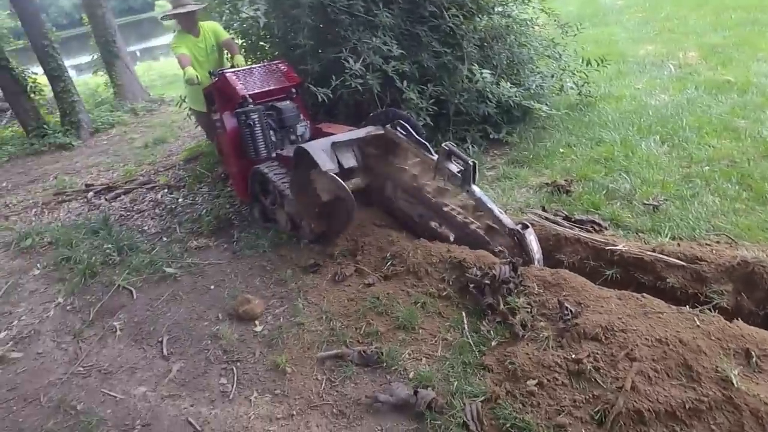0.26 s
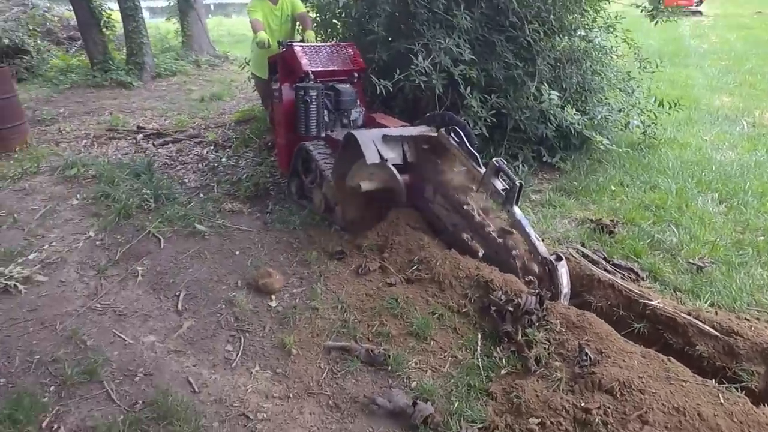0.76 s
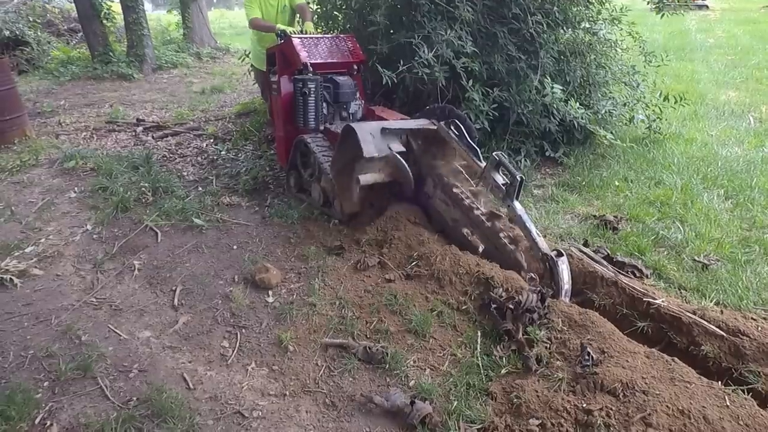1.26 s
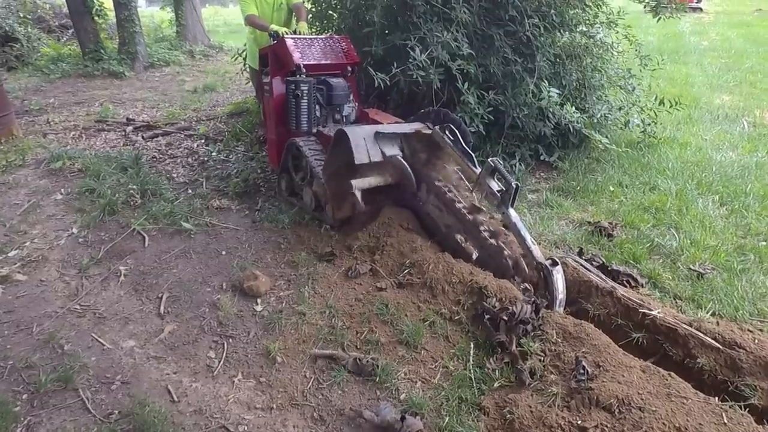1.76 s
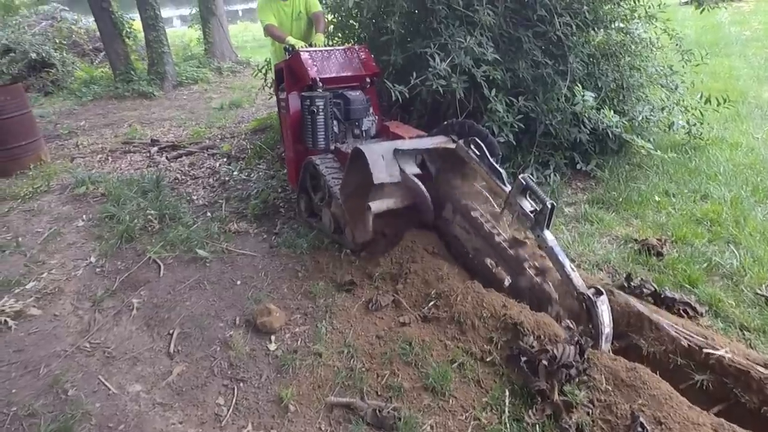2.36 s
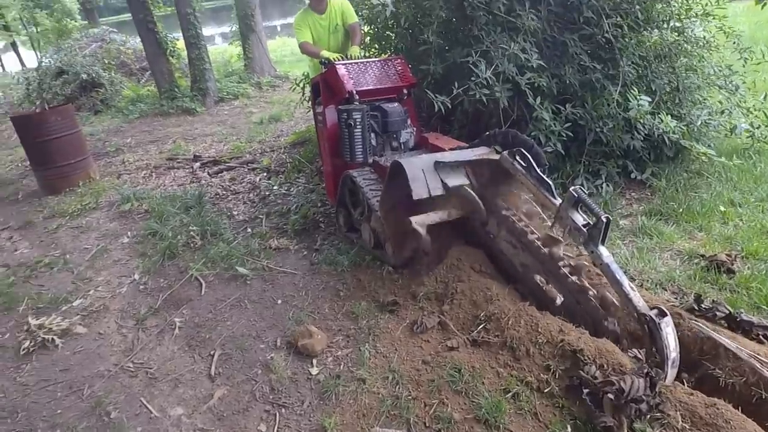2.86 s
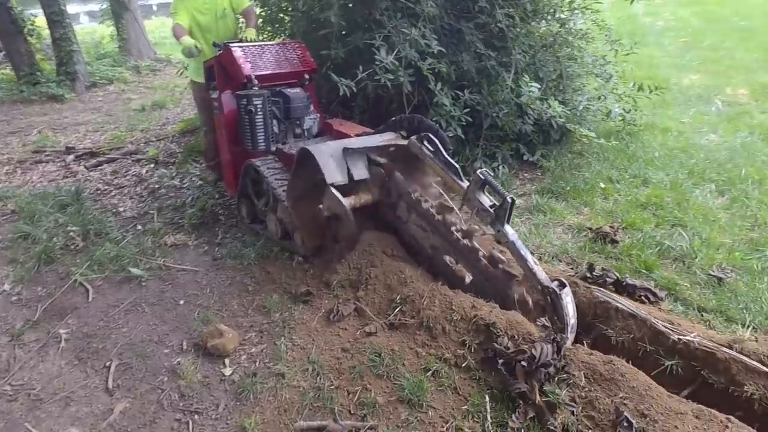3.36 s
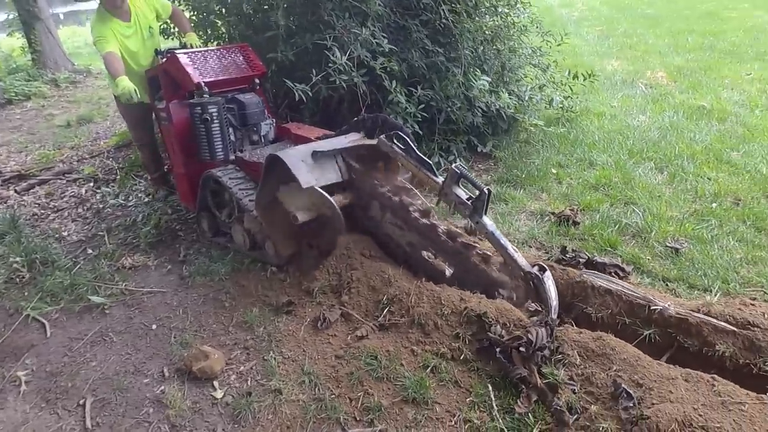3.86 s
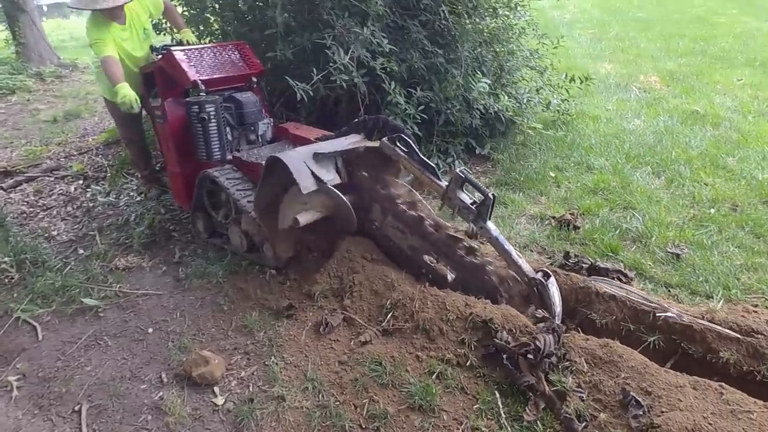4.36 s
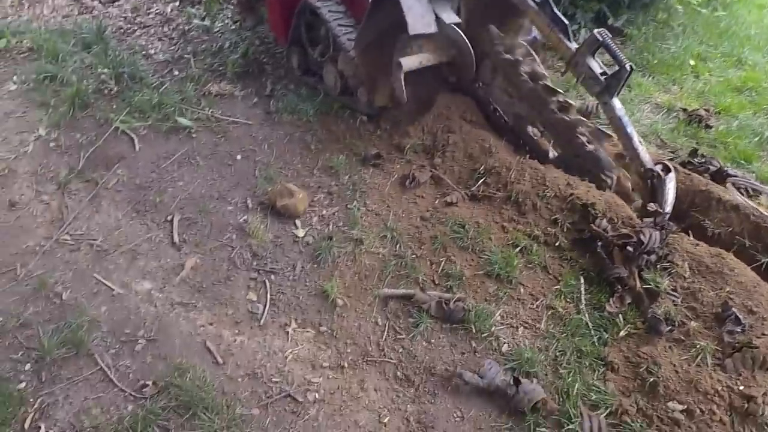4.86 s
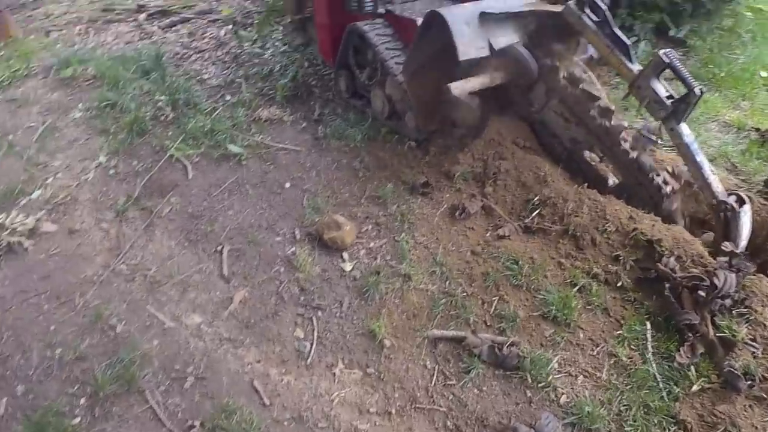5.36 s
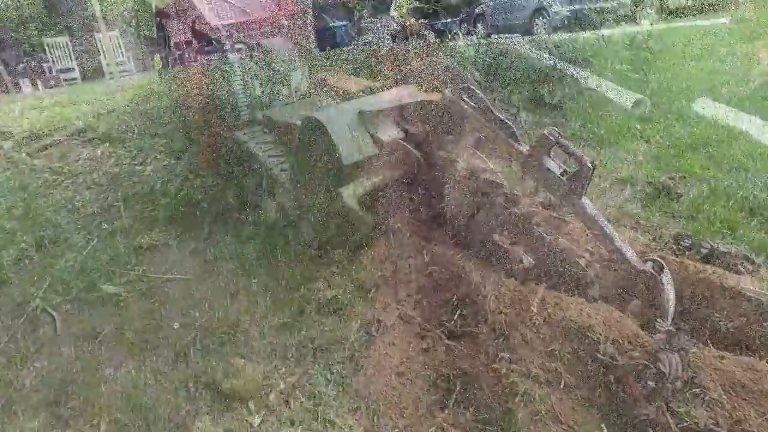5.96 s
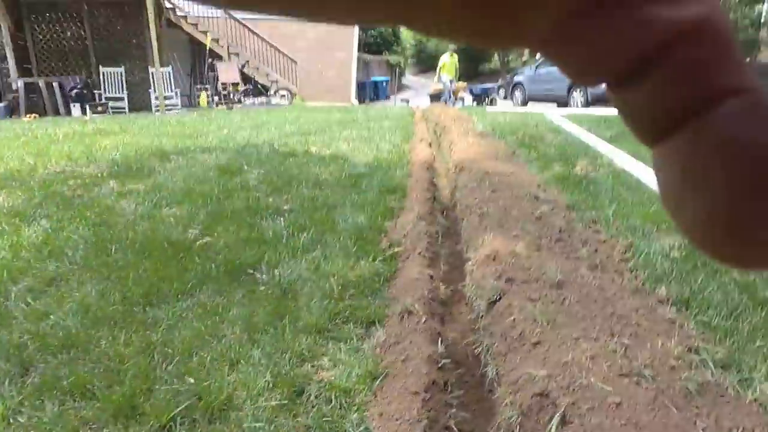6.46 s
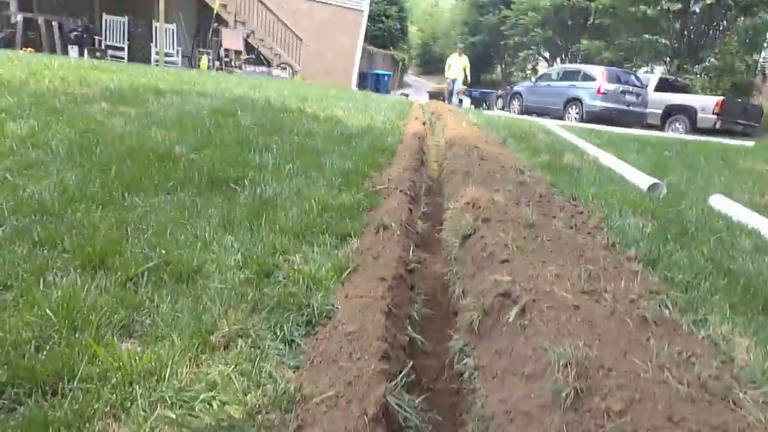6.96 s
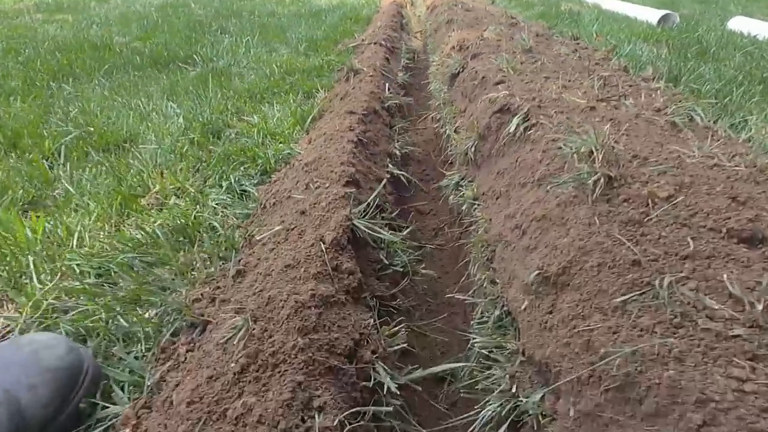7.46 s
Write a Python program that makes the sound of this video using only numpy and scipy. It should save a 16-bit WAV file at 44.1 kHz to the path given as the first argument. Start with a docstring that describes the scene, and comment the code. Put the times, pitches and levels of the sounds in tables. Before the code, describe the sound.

Outdoors, a nearby trenching machine keeps up a steady, throbbing engine drone with whining and metallic clatter. Its chain ticks and strikes stones while loose earth slides away with a gritty hiss. After about five and a half seconds it fades into a quiet lawn with a far-off motor humming. Fingers bump, tap and brush the microphone, and grass and clothing rustle faintly close by.

```python
"""At a trench, then on a quiet lawn. A tracked trencher digs at steady throttle: a V-twin fires unevenly
into its muffler, pump and fan whine, valve gear and covers clatter, earth slides off the chain and its
teeth knock on stones. The machine fades into soft air and a far, throbbing motor hum. A hand bumps,
taps and brushes the microphone housing; grass and cloth rustle close by."""
import sys
import numpy as np
from scipy import signal
from scipy.io import wavfile
from scipy.ndimage import uniform_filter1d

SR = 44100
rng = np.random.default_rng(int(sys.argv[2]) if len(sys.argv) > 2 else 0)


def generate_wav(sig):
    """Save sig (samples, or channels by samples) to the path in sys.argv[1] as 16-bit PCM at SR."""
    pcm = np.round(np.clip(np.atleast_2d(sig).T, -1, 1) * 32767).astype(np.int16)
    wavfile.write(sys.argv[1], SR, pcm)


N = 340452
TIME = np.arange(N) / SR

# Crank speed as the governor hunts: time_s, speed_rpm
CRANK_SPEED = [(0.0, 3410), (0.2, 3376), (0.41, 3481), (0.55, 3356), (1.05, 3436), (1.22, 3394),
               (1.5, 3427), (1.9, 3395), (2.07, 3445), (2.26, 3398), (2.62, 3425), (2.8, 3383),
               (3.28, 3426), (3.58, 3399), (4.36, 3424), (4.8, 3389), (5.0, 3416), (5.38, 3402),
               (5.73, 3465), (5.9, 3402), (6.4, 3428)]
# Fine hiss of grit, cooling air or a sliding finger: freq_hz, relative_db
HISS_SPECTRUM = [(4000, -27), (8000, -2), (10000, -4), (13000, 3), (15500, -6.5)]


def gain_of(db):
    return 10 ** (np.asarray(db) / 20)


def unit_rms(x):
    return x / np.sqrt(np.mean(x ** 2) + 1e-20)


def spectrum_db(points, hz):
    """Interpolate on a log-frequency axis."""
    freq_hz, level_db = np.transpose(points)
    return np.interp(np.log(hz + 1), np.log(freq_hz + 1), level_db)


def curve(points):
    """Time-value pairs, interpolated per sample."""
    return np.interp(TIME, *np.transpose(points))


def bell_curve(centre_s, width_s):
    return np.exp(-((TIME - centre_s) / width_s) ** 2)


def wander(rate_hz):
    """Slow random curve, rms 1."""
    smoothed = uniform_filter1d(rng.standard_normal(N), 400)
    return unit_rms(signal.lfilter([1], [1, -np.exp(-2 * np.pi * rate_hz / SR)], smoothed))


def tone(hz):
    """Sine following a pitch curve, rms 1."""
    return np.sqrt(2) * np.sin(2 * np.pi * np.cumsum(hz) / SR)


def add(mix, start_s, sound):
    part = mix[max(round(start_s * SR), 0):][:len(sound)]
    part += sound[:len(part)]


def resonate(x, hz, width_hz):
    """Unity-gain resonance: shift to 0 Hz, smooth, shift back."""
    carrier = np.exp(2j * np.pi * np.cumsum(hz * np.ones(len(x))) / SR)
    pole = np.exp(-np.pi * width_hz / SR)
    return 2 * (carrier * signal.lfilter([1 - pole], [1, -pole], x / carrier)).real


def impulse_response(points):
    """Minimum-phase response of a spectrum."""
    log_gain = spectrum_db(points, abs(np.fft.fftfreq(2 ** 15, 1 / SR))) * np.log(10) / 20
    return np.fft.ifft(np.exp(log_gain - 1j * signal.hilbert(log_gain).imag)).real[:2 ** 13]


def noise(points, patchy_db, flicker_db):
    """Shaped noise with drifting spectral patches and broadband flicker, rms 1."""
    frames, hz = N // 256 + 5, np.fft.rfftfreq(1024, 1 / SR)
    real, imag, patches = rng.standard_normal((frames, 513, 3)).T
    patches = unit_rms(uniform_filter1d(uniform_filter1d(patches, 12, 0), 10, 1))
    flicker = unit_rms(uniform_filter1d(rng.standard_normal(frames), 3))
    field_db = spectrum_db(points, hz)[:, None] + patchy_db * patches + flicker_db * flicker
    spectra = (real + 1j * imag) * gain_of(field_db)
    return unit_rms(signal.istft(spectra, nperseg=1024, noverlap=768)[1][:N])


def knock(level_db, hz, thwack_db, treble_db, ring_s, crack_s):
    """Impact: a ring, a broad thwack above it, a bright crack. Decay times are to -60 dB."""
    t = np.arange(3000) / SR
    front = gain_of(-60 * t / crack_s) * np.minimum(t / 0.00047, 1)
    ring = np.sin(2 * np.pi * hz * t) * gain_of(-60 * t / ring_s)
    thwack = unit_rms(resonate(rng.standard_normal(len(t)), 1.76 * hz, hz)) * gain_of(thwack_db) * front
    crack = rng.standard_normal(len(t)) * gain_of(treble_db) * front
    return gain_of(level_db) * (1.12 * ring + 0.63 * thwack + 1.7 * crack)


def firings(uneven_db, second_db):
    """One click per firing of a four-stroke twin, cylinders 270 of 720 degrees apart."""
    cycles = np.cumsum(curve(CRANK_SPEED) / 120) / SR - 0.492  # two turns per cycle
    clicks = np.zeros(N)
    for lag_cycles, level_db in ((0, 0), (3 / 8, second_db)):
        at = np.flatnonzero(np.diff(np.floor(cycles - lag_cycles)))
        clicks[at] = gain_of(level_db + uneven_db * rng.standard_normal(400)[:len(at)])
    return clicks


def exhaust(clicks, level_db=-19):
    """Each firing rings the muffler; unburnt fuel from a weak firing feeds the next cycles."""
    # Response of muffler and ground: freq_hz, relative_db
    muffler = [(8, -45), (28, -24), (57, -7), (85, -14), (114, -14), (142, 0), (171, -2), (199, 0),
               (228, -14), (256, -23), (312, -41), (341, -24), (370, -22), (398, -31), (426, -26),
               (455, -32), (490, -26), (540, -26), (568, -22), (600, -31), (700, -30), (1000, -50)]
    # Weak firings: time_s, loss_db
    stumbles = [(.9, 2), (1.155, 3.5), (2.03, 3), (2.24, 3.5), (3.65, 4), (3.9, 5), (4.531, 0.5),
                (4.86, 2.5), (5.649, 2)]
    for time_s, loss_db in stumbles:
        rebound = 0.13 * bell_curve(time_s + 0.08, 0.11)
        level_db = level_db - loss_db * (bell_curve(time_s, 0.025) - rebound)
    ring = -impulse_response(muffler)
    steady_rms = np.sqrt(np.mean(signal.oaconvolve(clicks, ring) ** 2))
    drive = clicks * gain_of(level_db)
    lead_in = round(SR * 120 / CRANK_SPEED[0][1])  # one cycle: already running at the start
    return signal.oaconvolve(np.r_[drive[:lead_in], drive], ring)[lead_in:N + lead_in] / steady_rms


def pump_and_fan(gear_hz=644.6, rise_hz_per_s=0.5, blades=27):
    """Trembling gear tone of the hydraulic pump; thin fan whine at the blade rate."""
    # Pump tone: time_s, level_db
    pump_level = [(0, -40), (.8, -39.5), (1.5, -37), (3.2, -36.5), (4.1, -37), (5.5, -39)]
    # Fan whine: time_s, level_db
    fan_level = [(.9, -57), (1.3, -48), (4.5, -49), (4.9, -57), (5.6, -50.5), (6.2, -46)]
    pump = tone(gear_hz + rise_hz_per_s * TIME + 0.5 * wander(rate_hz=13))
    fan = tone(blades * curve(CRANK_SPEED) / 60 + 4.66 * wander(rate_hz=14))
    fan *= gain_of(curve(fan_level) + 2.3 * wander(rate_hz=6.5))
    pump *= gain_of(curve(pump_level) + 1.2 * wander(rate_hz=7.7))
    return pump + fan


def firing_puffs(clicks):
    """Envelope: a swell of random size just after each firing."""
    t = np.arange(1200) / SR
    swell = (t / 0.0028) ** 2 * np.exp(2 - 2 * t / 0.003)
    return signal.oaconvolve(clicks * gain_of(1.34 * rng.standard_normal(N)), swell)[:N]


def clatter(puffs):
    """Valve gear, casing, fan and chain: noise pulsing with the firings."""
    # Mechanical noise: freq_hz, relative_db
    spectrum = [(20, -12), (50, -22), (120, -11.5), (220, -10.5), (310, -21.5), (400, -20), (480, -15),
                (650, -12), (860, -24), (1500, -22.5), (2500, -36), (3500, -32), (5000, -39.5),
                (15000, -79)]
    return gain_of(1) * noise(spectrum, patchy_db=-1, flicker_db=1.72) * (0.67 + 0.22 * puffs)


def covers(bite_db):
    """Covers ring, louder as the chain bites."""
    # Cover resonances: pitch_hz, width_hz, relative_db
    modes = [(965.5, 62, -14.5), (2117, 30, -28), (5050, 96, -24.5), (6330, 150, -29)]
    out = np.zeros(N)
    for hz, width_hz, relative_db in modes:
        gain = gain_of(relative_db + 1.3 * bite_db + 2.6 * wander(rate_hz=2.1))
        out += gain * unit_rms(resonate(rng.standard_normal(N), hz, width_hz))
    return out


def rattle(hits_per_s=110, parts=16):
    """Small parts knock at random, each at its own pitch; rms 1."""
    size_db = 4.8 * np.minimum(rng.exponential(1, N), 3)
    hits = gain_of(size_db) * (rng.random(N) < hits_per_s / SR)
    struck_part = rng.integers(0, parts, N)
    out = np.zeros(N)
    for part, hz in enumerate(np.geomspace(450, 2200, parts)):
        ring = knock(0, hz, thwack_db=-10, treble_db=-17, ring_s=0.024, crack_s=0.055)
        out += signal.oaconvolve(hits * (struck_part == part), ring)[:N]
    return unit_rms(out)


def earth(puffs, bite_db):
    """Soil and grit slide off the teeth; a bright spray swells as the microphone tips toward them."""
    # Sliding soil: freq_hz, relative_db
    soil_spectrum = [(1000, -16), (3000, -4.5), (5000, -3.5), (7000, -2.5), (10000, -6.5), (15000, -27)]
    # Grit spray: freq_hz, relative_db
    spray_spectrum = [(6000, -28), (7500, -9), (9500, -20), (12300, -12), (13500, 0), (15500, 0)]
    soil = gain_of(-44.5 + bite_db) * noise(soil_spectrum, patchy_db=2.5, flicker_db=2.3)
    grit = gain_of(-46 + 0.5 * bite_db) * noise(HISS_SPECTRUM, patchy_db=1.5, flicker_db=0.4)
    spray = gain_of(-42) * bell_curve(5.05, 0.4) * noise(spray_spectrum, patchy_db=1.5, flicker_db=-1)
    return soil * (0.81 + 0.5 * puffs) + grit * (1.1 + 0.18 * puffs) + spray


def casing_pops(trim_db=-5.5, pitch_hz=688):
    """Dull pops where a firing shakes the casing harder."""
    # Casing pops: start_s, relative_db
    pops = [(0.022, -15), (0.267, -23), (0.335, -31), (0.652, -26), (0.724, -16), (0.97, -14.5),
            (1.638, -31), (1.99, -16), (2.108, -25), (2.34, -20), (2.989, -14.5), (3.294, -14),
            (3.515, -11.5), (3.713, -27), (4.219, -23), (4.64, -35), (5.17, -19), (5.382, -19)]
    out = np.zeros(N)
    for start_s, relative_db in pops:
        pop = knock(relative_db, pitch_hz, thwack_db=-11.5, treble_db=-25, ring_s=0.021, crack_s=0.042)
        add(out, start_s, pop)
    return gain_of(trim_db) * out


def link_ticks(fade, sharp_trim_db=-5.5, faint_db=-37, faint_per_s=5):
    """Chain links tick: sharp ones at set times, faint random ones that follow the fade."""
    # Sharp link ticks: start_s, relative_db, pitch_hz
    sharp_ticks = [(0.042, -26.5, 5200), (0.8789, -25, 5430), (1.0225, -29.5, 9200), (1.124, -26.5, 4800),
                   (1.1608, -31, 4760), (1.406, -31, 5250), (1.484, -29, 11100), (1.6511, -30, 10700),
                   (1.997, -24, 5050), (2.2034, -29, 4720), (2.239, -27, 10600), (2.4114, -32, 4980),
                   (2.6928, -26.5, 6390), (2.8454, -27.5, 4960), (3.0809, -33, 6390), (3.254, -30, 4900),
                   (3.2984, -29, 10300), (3.351, -23.5, 6110), (3.4376, -28, 5050), (3.625, -22.5, 10240),
                   (3.67, -28.5, 5050), (3.8488, -26.5, 12200), (3.8733, -24, 11400), (3.9108, -25, 4940),
                   (4.2782, -33, 4990), (4.811, -27.5, 4850), (5.05, -31, 7940), (5.228, -32, 11500),
                   (5.3427, -28, 12900), (5.452, -26.5, 6000), (5.621, -26.5, 5870), (6.0362, -32.5, 5770),
                   (6.2412, -37, 12000)]
    # Link resonances of the faint ticks: pitch_hz
    links_hz = [5030, 6300, 10300, 12000, 13500]
    out = np.zeros(N)
    for start_s, relative_db, hz in sharp_ticks:
        tick = knock(relative_db, hz, thwack_db=-1, treble_db=1.5, ring_s=0.024, crack_s=0.025)
        add(out, start_s, gain_of(sharp_trim_db) * tick)
    for hz in links_hz:
        size = gain_of(faint_db + 4 * rng.standard_normal(N))
        hits = size * (rng.random(N) < faint_per_s / len(links_hz) / SR)
        tick = knock(0, hz, thwack_db=-1, treble_db=1.5, ring_s=0.021, crack_s=0.023)
        out += signal.oaconvolve(hits * fade, tick)[:N]
    return out


def stone_knocks(treble_db=-21):
    """Chain teeth strike stones; the digging boom rings with each blow."""
    # Blows on stones: start_s, level_db, pitch_hz, thwack_db
    blows = [(0.4384, -31, 1380, -20), (0.7023, -31, 1410, -5), (1.124, -22, 2030, -8),
             (1.1613, -33, 2040, -10), (1.3037, -19.5, 1450, -15), (1.6816, -29.5, 2040, -16),
             (1.8583, -25.5, 1380, -4), (2.2046, -20.5, 1346, 5.5), (2.2365, -25, 1410, -1),
             (2.2756, -24.5, 1370, -1), (2.4114, -22, 1450, -6), (2.6394, -27.5, 1200, -16),
             (2.8456, -24.5, 1525, -6), (3.3505, -26, 2080, -13), (3.5833, -26, 1000, -3),
             (3.8741, -23.5, 1110, -12), (3.9105, -26.5, 1495, -13), (4.3226, -25.5, 939, 3),
             (4.8115, -33, 1480, -11), (5.1986, -28.5, 985, -15), (5.4051, -24.5, 967, -19)]
    # Boom resonances: pitch_hz, relative_db
    boom_modes = [(1450, -9), (2070, -12.5)]
    out = np.zeros(N)
    for start_s, level_db, hz, thwack_db in blows:
        add(out, start_s, knock(level_db, hz, thwack_db, treble_db, ring_s=0.027, crack_s=0.016))
        for mode_hz, relative_db in boom_modes:
            ring = knock(level_db + relative_db, mode_hz, -8, treble_db, ring_s=0.017, crack_s=0.012)
            add(out, start_s, ring)
    return out


def lawn_air(level_db=-46.5):
    """Soft outdoor air, fuller while the hand holds the housing."""
    # Background air: freq_hz, relative_db
    spectrum = [(20, -20), (36, -5.5), (60, 0), (130, -11), (300, -12), (600, -21), (1200, -27),
                (2200, -37), (3500, -36), (12500, -47), (14500, -35)]
    handling_db = 6 * bell_curve(6.41, 0.34)
    return gain_of(level_db + handling_db) * noise(spectrum, patchy_db=2.2, flicker_db=1)


def far_hum(level_db=-46.5, throb_hz=3.9, crest_s=6.55):
    """A far motor hums and beats slowly."""
    # Motor partials: pitch_hz, relative_db
    partials = [(118.4, -54.5), (236.9, -47.5), (355.3, -67), (672.9, -93), (1238, -70.5)]
    hum = np.zeros(N)
    for hz, relative_db in partials:
        gain = gain_of(relative_db + 1.2 * wander(rate_hz=2))
        hum += gain * np.sin(2 * np.pi * (hz * TIME + rng.random()))
    throb = 1 + 0.36 * np.cos(2 * np.pi * throb_hz * (TIME - crest_s))
    return gain_of(level_db) * throb * unit_rms(hum)


def hand():
    """Low bumps shake the microphone; fingertips tap its housing."""
    # Bumps: start_s, level_db, pitch_hz, cycles
    bumps = [(6.24, -32, 40.07, 2), (6.5, -27.5, 49.2, 3), (6.68, -32, 45, 1.6), (6.825, -26, 26, 2)]
    # Finger taps: start_s, level_db, pitch_hz, treble_db
    taps = [(6.422, -40, 794, -23), (6.433, -36, 840, -28), (6.449, -36, 980, -32), (6.463, -34, 630, -27),
            (6.502, -36, 660, -12), (6.534, -36, 513, -27), (6.676, -31, 945, -14), (6.713, -31, 533, -22),
            (7.677, -43, 900, -18), (7.694, -54, 11500, -3)]
    out = np.zeros(N)
    for start_s, level_db, hz, cycles in bumps:
        progress = np.arange(0, 1, hz / cycles / SR)
        bump = np.sin(2 * np.pi * cycles * progress) * np.sin(np.pi * progress)
        add(out, start_s, gain_of(level_db) * bump)
    for start_s, level_db, hz, treble_db in taps:
        add(out, start_s, knock(level_db, hz, -8.5, treble_db, ring_s=0.025, crack_s=0.024))
    return out


def finger_slide(peak_s=6.724, peak_db=-37.5, rise_db_per_s=400, fall_db_per_s=2500):
    """A finger slides over the housing: hiss swells and stops short."""
    since_s = TIME - peak_s
    level_db = peak_db + np.minimum(rise_db_per_s * since_s, -fall_db_per_s * since_s)
    return gain_of(level_db) * noise(HISS_SPECTRUM, patchy_db=1.5, flicker_db=-1)


def rustle(start_s=6.72, rise_s=0.25, hold_s=0.41, fall_s=0.17, rest_db=-74, swell_db=-57.5):
    """Grass and cloth rustle close by, swelling once."""
    # Grass and cloth: freq_hz, relative_db
    spectrum = [(1500, -25), (3000, -4), (5000, -1), (8000, -2), (10500, -7), (12000, 6.5), (13500, -1),
                (15500, -18)]
    corners_s = start_s + np.cumsum([0, rise_s, hold_s, fall_s])
    level_db = np.interp(TIME, corners_s, [rest_db, swell_db, swell_db, rest_db])
    return gain_of(level_db) * noise(spectrum, patchy_db=0, flicker_db=3)


def scene():
    """Trencher crossfading into the lawn, mono."""
    # Bite of the chain in the ground: time_s, lift_db
    bite = [(0, 0), (.5, -1), (1.7, -0.5), (2.2, 2.5), (3.1, 1), (3.5, 1), (4.1, 2), (4.7, 0), (5.5, 1)]
    bite_db = curve(bite)
    fade_out = np.interp(TIME, [5.5, 6.445], [1, 0])
    fade_in = np.clip((TIME - 5.2) / 0.6, 0, 1)
    clicks = firings(uneven_db=0.35, second_db=3)
    engine = exhaust(clicks) + pump_and_fan()
    puffs = firing_puffs(clicks)
    body = gain_of(-32.5) * (clatter(puffs) + covers(bite_db) + gain_of(-15) * rattle())
    trencher = engine + body + earth(puffs, bite_db)
    impacts = stone_knocks() + link_ticks(fade_out) + casing_pops()
    lawn = far_hum() + lawn_air() + rustle() + finger_slide()
    return (fade_out * trencher + impacts + fade_in * lawn + hand())[None]


def record(dry, cutoff_hz=15200):
    """Microphone colour, then a steep low-pass."""
    # Small microphone in its housing: freq_hz, gain_db
    mic_response = [(2500, 1.5), (3200, -5), (3650, -10), (4200, -6), (5000, -3), (5600, -5), (6400, -5.5),
                    (7400, -9.5), (9400, -7.5), (10300, -2.5), (12400, -5), (13400, -13.5), (15200, -18)]
    coloured = signal.oaconvolve(dry, impulse_response(mic_response)[None, :1024])[:, :N]
    low_pass = signal.firwin(511, cutoff_hz, window=("kaiser", 9), fs=SR)
    return signal.oaconvolve(coloured, low_pass[None], "same")


dry = scene()
out = record(dry)
generate_wav(out)
```